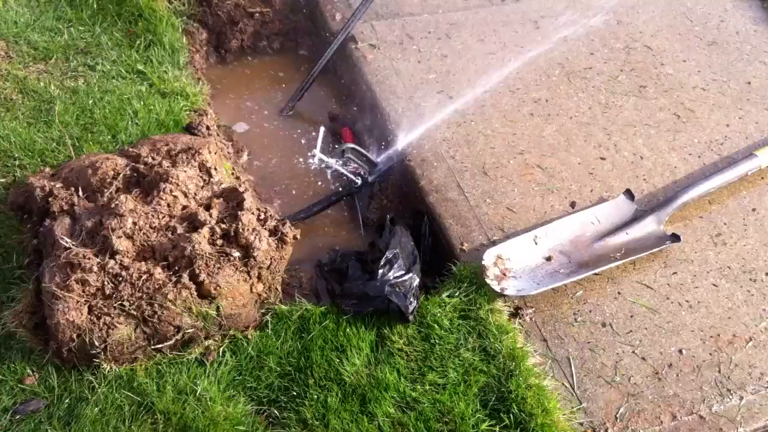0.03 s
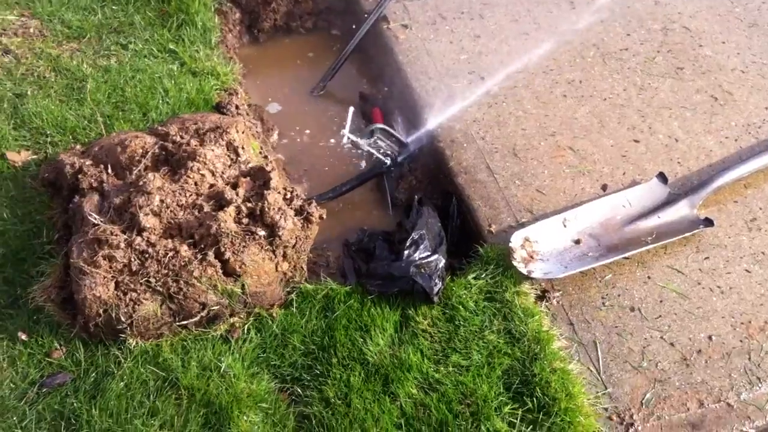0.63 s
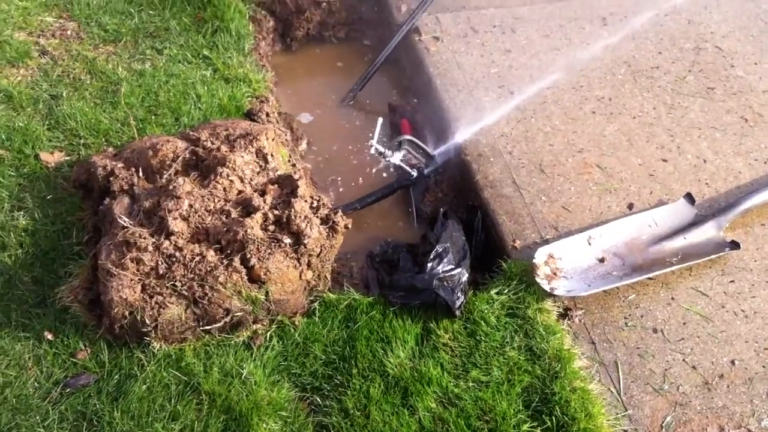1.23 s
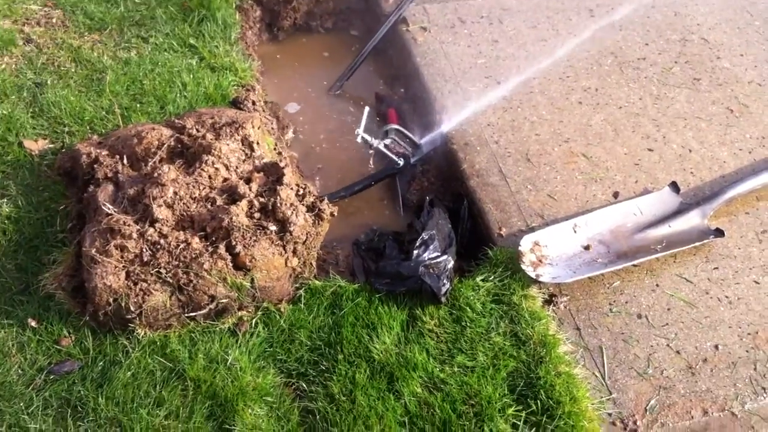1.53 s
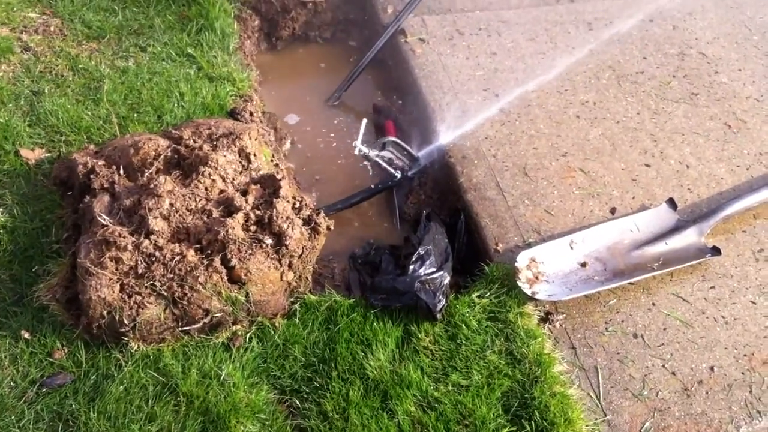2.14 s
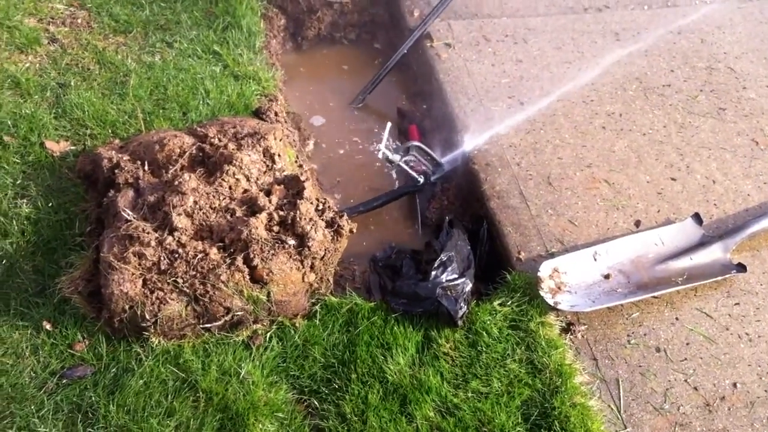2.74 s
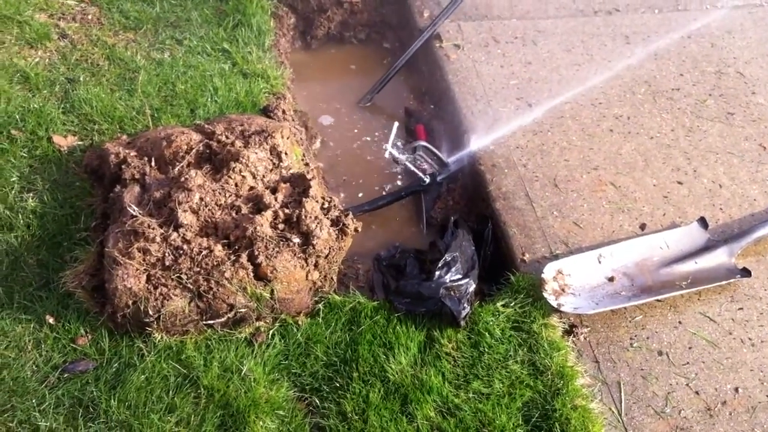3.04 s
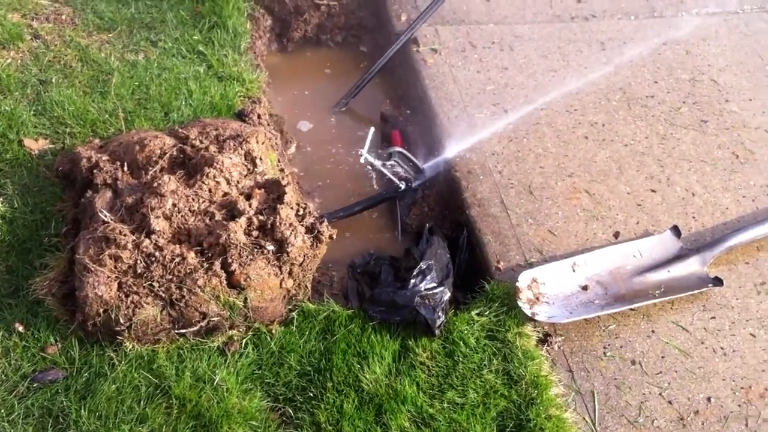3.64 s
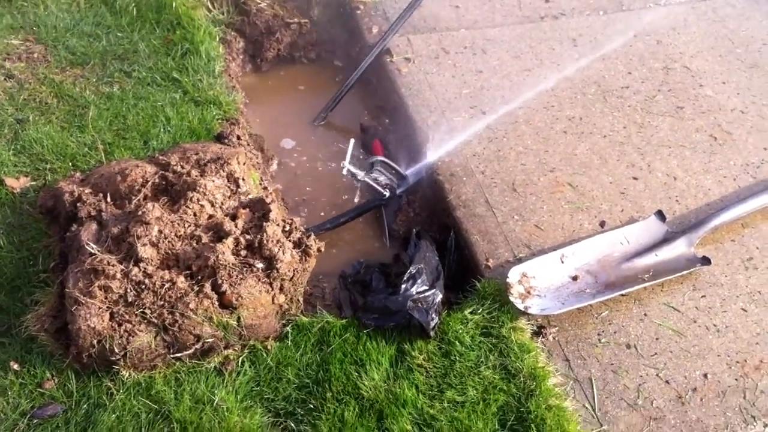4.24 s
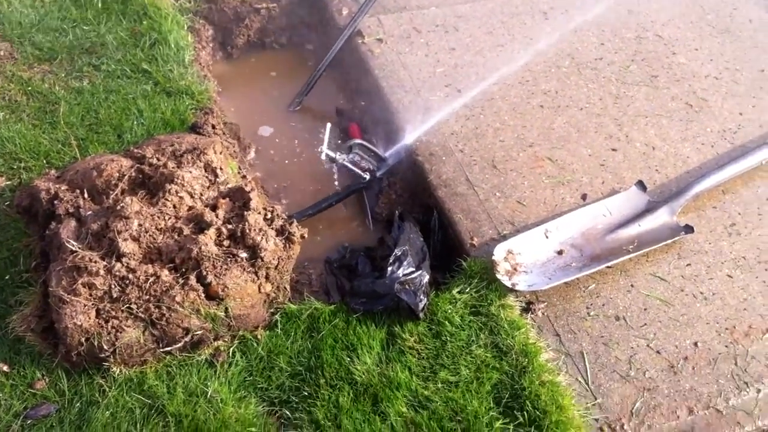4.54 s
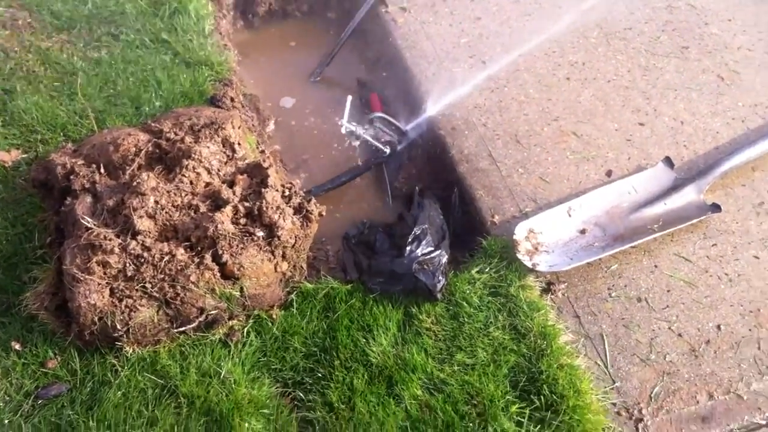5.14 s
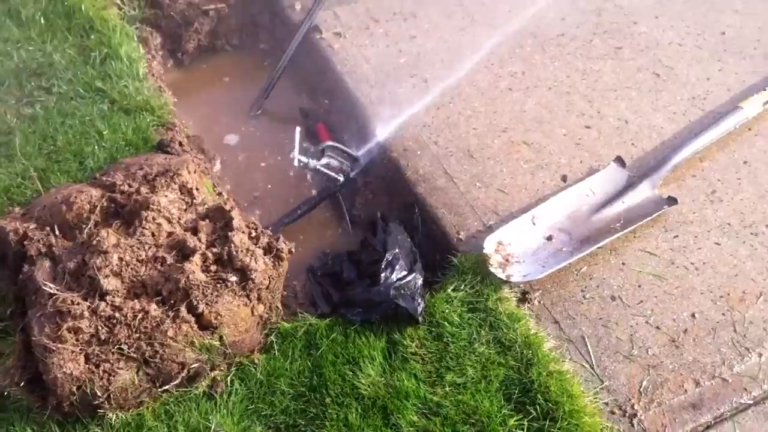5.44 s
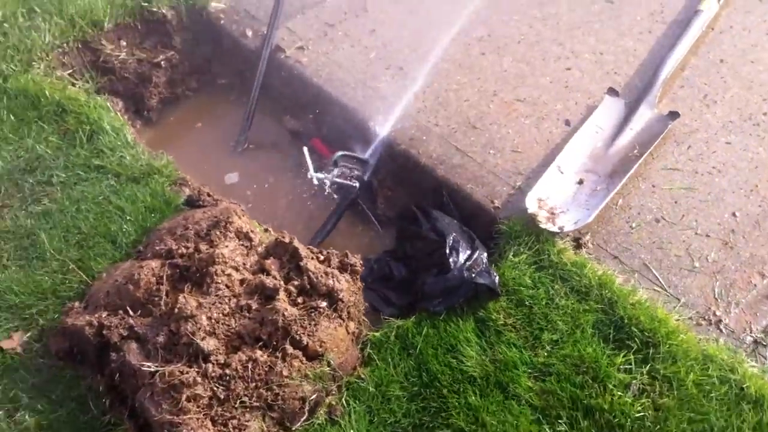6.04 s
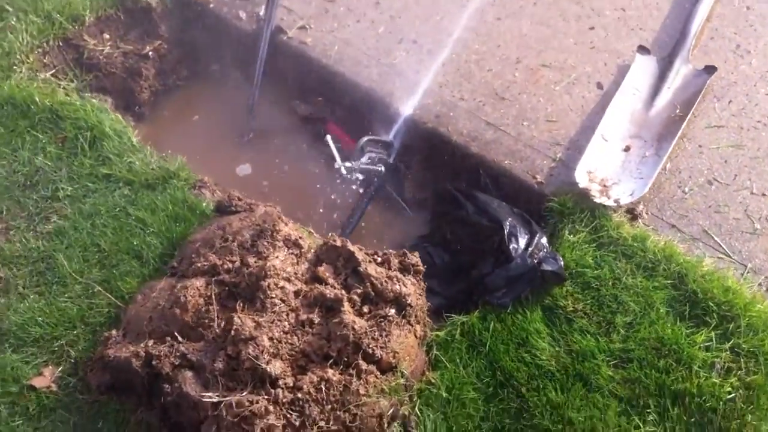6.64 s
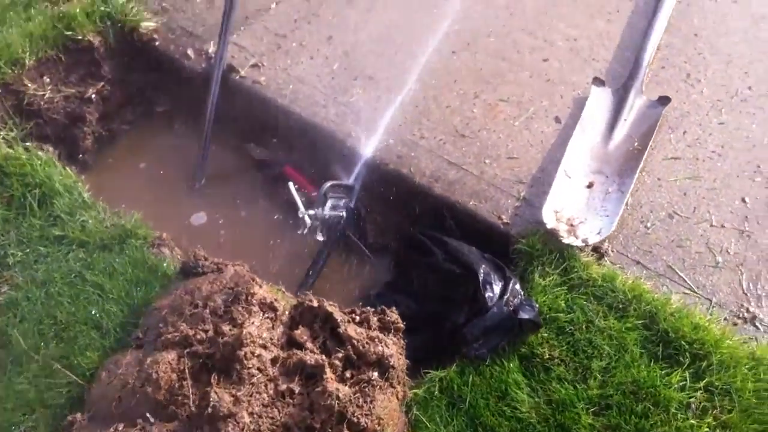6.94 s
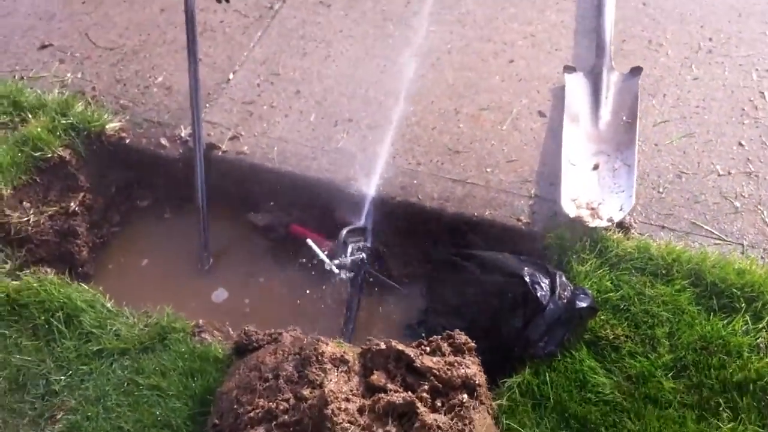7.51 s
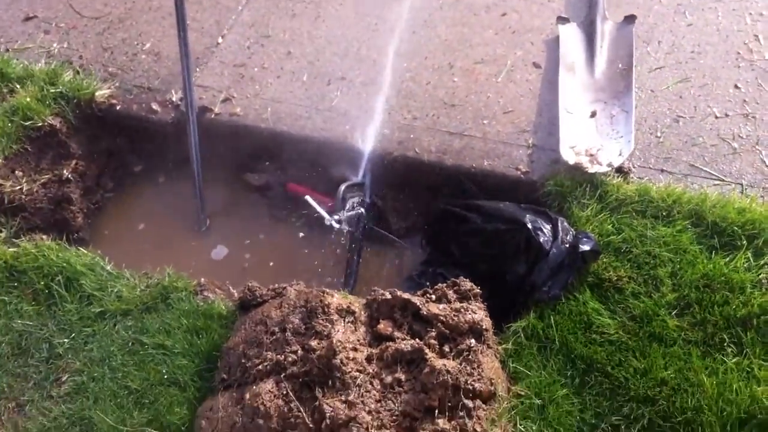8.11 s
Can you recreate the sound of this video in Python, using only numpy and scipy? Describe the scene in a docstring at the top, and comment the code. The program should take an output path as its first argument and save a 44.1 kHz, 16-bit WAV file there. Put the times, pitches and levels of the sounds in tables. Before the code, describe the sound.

A thin jet of water hisses steadily from a split pipe, with faint handling ticks and a few drops plopping into a puddle.

```python
"""Split pipe beside a path

A thin jet of water hisses from a split pipe in a flooded hole, tearing into mist. The hand-held
microphone rumbles, creaks and ticks as its casing slips in the grip. A few drops plop into the puddle,
each ringing a bubble. The microphone is then carried round the hole: the wall reflections that colour
the hiss slide, the treble rises and the hand adds soft bumps."""
import sys
import numpy as np
from scipy import signal
from scipy.fft import rfft, irfft
from scipy.io import wavfile

SR = 44100
rng = np.random.default_rng(int(sys.argv[2]) if len(sys.argv) > 2 else 0)


def inscribe(sig):
    """Save sig as 16-bit PCM at rate SR to the path in sys.argv[1].

    A 1-D sig is mono; a 2-D sig holds one channel per row.
    Samples are clipped to [-1, 1] before scaling.
    """
    pcm = np.round(np.clip(np.atleast_2d(sig).T, -1, 1) * 32767)
    wavfile.write(sys.argv[1], SR, pcm.astype(np.int16))


N = 369116
TIME = np.arange(N) / SR
BIN_HZ = np.arange(N // 2 + 1) * SR / N


def from_db(db):
    """Decibels to gain."""
    return 10 ** (np.asarray(db) / 20)


def unit_rms(x):
    """Scale to an rms of 1."""
    return x / np.sqrt(np.mean(x ** 2) + 1e-20)


def spectrum_db(points, hz):
    """Interpolate (Hz, dB) points on a log-frequency axis."""
    point_hz, db = np.transpose(points)
    return np.interp(np.log(hz + 1), np.log(point_hz), db)


def bell(x, centre, width):
    """Gaussian hump of height 1."""
    return np.exp(-.5 * ((x - centre) / width) ** 2)


def drift(rate_hz):
    """Unit-rms noise, low-passed at rate_hz."""
    return unit_rms(irfft(rfft(rng.standard_normal(N)) / (1 + (BIN_HZ / rate_hz) ** 2), N))


def resonate(x, hz, width_hz):
    """Two-pole resonance, peak gain 1."""
    radius = np.exp(-np.pi * width_hz / SR)
    zeros = np.array([1, 0, -1]) * (1 - radius ** 2) / 2
    poles = [1, -2 * radius * np.cos(2 * np.pi * hz / SR), radius ** 2]
    return signal.lfilter(zeros, poles, x + 1e-18)


def add(out, start_s, sound):
    """Mix a short sound in at start_s."""
    i = max(round(start_s * SR), 0)
    out[i:i + len(sound)] += sound[:N - i]


def mist(spurts_per_s=260, spurt_s=0.0038, spurt_share=0.089, flutter_db=0.61):
    """Water tears into mist: white hiss plus tiny spurts that start sharply and die away."""
    onsets = (rng.random(N) < spurts_per_s / SR) * rng.exponential(1, N)
    spurts = signal.lfilter([1], [1, -np.exp(-1 / (spurt_s * SR))], onsets + 1e-18)
    power = 1 - spurt_share + spurt_share * spurts / spurts.mean()
    return unit_rms(rng.standard_normal(N) * np.sqrt(power) * from_db(flutter_db * drift(rate_hz=19)))


# Peaks and notches from the walls of the hole. Each row: centre in Hz, width in Hz, gain in dB,
# slide over the swing in Hz, gain change over the swing in dB.
WALL_REFLECTIONS = [(1846, 209, 3.1, 49, .6), (2095, 129, -6, 168, 3.3), (2896, 198, 5.2, -221, -2.1),
                    (3314, 64, -6.8, 36, 6.5), (3581, 95, 2.7, 410, .3), (4760, 330, 3.8, -90, -9.5),
                    (5110, 100, -2.8, -150, -2.5), (5470, 227, 3.8, -40, -.3), (6354, 161, -3.4, -51, 0),
                    (7387, 341, 5.7, 245, -2), (7924, 405, -8.9, -58, 5.9), (9763, 321, 5.3, -428, -3.2),
                    (10795, 518, -1, 150, 4.6), (11794, 298, 4, 339, -8.2), (13005, 432, 3.7, 633, -2.9)]


def reflections_db(hz, t, swing_mid_s=6.1, swing_ease_s=0.48, waver_db=0.85):
    """Reflections slide as the microphone swings round the hole; each wavers with the wobbling jet."""
    swing = (1 + np.tanh((t - swing_mid_s) / (2 * swing_ease_s))) / 2   # 0 beside the jet, 1 behind it
    db = 0
    for centre_hz, width_hz, gain_db, slide_hz, change_db in WALL_REFLECTIONS:
        wobble = np.interp(t, TIME, drift(rate_hz=8.8))
        height_db = gain_db + change_db * swing + waver_db * wobble
        db = db + height_db * bell(hz, centre_hz + slide_hz * swing, width_hz)
    return db


# Brightness of the hiss. Each row: time in seconds, relative treble level in dB.
TREBLE_CURVE = [(0.35, -36.5), (0.39, -35.5), (2.14, -34.5), (2.34, -33.5), (3.83, -33.5), (4.25, -32.5),
                (5.37, -33), (5.46, -31), (6.37, -31), (6.61, -28), (6.99, -31), (7.21, -29), (8.3, -28.5)]


def facing_db(hz, t, mean_lift_db=3.5, depth=1.14, reference_hz=14000, exponent=1.08):
    """The treble rises as the microphone comes to face the jet."""
    treble_db = np.interp(t, *np.transpose(TREBLE_CURVE))
    lift_db = mean_lift_db + depth * (treble_db - treble_db.mean())
    return lift_db * (hz / reference_hz) ** exponent


# Base spectrum of the jet. Each row: frequency in Hz, density in dB per Hz.
JET_SPECTRUM = [(30, -104), (65, -112), (110, -94.5), (170, -85.5), (300, -82.5), (550, -86.5), (800, -83),
                (1050, -83.5), (1500, -82), (2600, -81.5), (5000, -71), (8000, -73), (12000, -75.5),
                (14500, -76), (15500, -80)]
# Brief hollows in the hiss. Each row: start and end in seconds, centre and width in Hz, gain in dB.
HISS_DIPS = [(2.99, 3.555, 3230, 990, -3), (2.994, 3.3, 2170, 70, -21)]


def jet(dip_edge_s=0.034):
    """The hiss of the mist, coloured by the hole and by where the microphone is."""
    frames = dict(nperseg=2048, noverlap=1536)
    hz, t, hiss = signal.stft(mist() * np.sqrt(SR / 2), SR, **frames)   # 0 dB per Hz
    hz = hz[:, None]
    db = spectrum_db(JET_SPECTRUM, hz) + facing_db(hz, t) + reflections_db(hz, t)
    for start_s, end_s, centre_hz, width_hz, dip_db in HISS_DIPS:
        inside = np.clip(np.minimum(t - start_s, end_s - t) / dip_edge_s + .5, 0, 1)
        db += dip_db * inside * bell(hz, centre_hz, width_hz)
    _, coloured = signal.istft(hiss * from_db(db), SR, **frames)
    return coloured[:N]


# Handling noise spectrum. Each row: frequency in Hz, relative level in dB.
RUMBLE_SPECTRUM = [(20, 5), (55, -9), (95, 9), (140, 9.5), (260, -7), (400, -27), (900, -45)]


def hand_rumble(rest_db=-78, grip_db=-62, settle_db_per_s=22, carry_db=-55.5, carry_s=6.62, lumps_db=3.5):
    """Lumpy rumble that fades as the grip settles and swells as the microphone is carried."""
    settling = from_db(grip_db - settle_db_per_s * TIME)
    carrying = from_db(carry_db) * bell(TIME, carry_s, width=0.41)
    colour = from_db(spectrum_db(RUMBLE_SPECTRUM, BIN_HZ))
    rumble = unit_rms(irfft(rfft(rng.standard_normal(N)) * colour, N))
    return rumble * (from_db(rest_db) + settling + carrying) * from_db(lumps_db * drift(rate_hz=12))


# Creaks of the grip. Each row: start and length in seconds, relative level in dB, body knock gain in dB.
GRIP_CREAKS = [(0.2094, 0.017, -19, 1), (.233, 0.0024, -23, -2), (0.2922, .0115, -17.5, -2),
               (.3105, 0.0026, -20.5, -8), (0.6502, 0.0114, -19, 3.5), (.7984, 0.002, -24.5, 9),
               (0.8238, 0.0024, -23, 6)]


def creaks(slips_per_s=4000, snap=2.2, gain_db=8):
    """Runs of tiny slips in the grip. Returns the forces on the casing's shell and body."""
    shell, body = np.zeros((2, N))
    for start_s, length_s, db, knock_db in GRIP_CREAKS:
        n = max(round(length_s * SR), 2)
        strengths = 2 * rng.random(SR)[:n] - 1
        slips = strengths * (rng.random(SR)[:n] < slips_per_s / SR)
        slips[0] = snap   # the grip lets go at once, then stutters
        slips = unit_rms(slips) * from_db(db + gain_db)
        add(shell, start_s, slips)
        add(body, start_s, slips * from_db(knock_db))
    return shell, body


# Clear ticks of the casing. Each row: start in seconds, relative peak in dB.
CLEAR_TICKS = [(0.5264, -11), (0.549, -9), (0.9589, -13), (1.076, -6.5), (1.1953, -9), (1.265, -6),
               (1.3166, -8), (1.43, -10.5), (1.744, -7.5), (1.8509, -9.5), (1.897, -11.5), (2.249, -11)]


def ticks(faint_count=7, faint_range_db=(-19, -13), gain_db=9.5, grit_db=-19, grit_s=0.0034):
    """Force of single slips with gritty tails; faint ones fall at random among the clear ones."""
    first_s, last_s = CLEAR_TICKS[0][0], CLEAR_TICKS[-1][0]
    faint = [(rng.uniform(first_s, last_s), rng.uniform(*faint_range_db)) for _ in range(faint_count)]
    force, age = np.zeros(N), TIME[:SR // 100]
    for start_s, db in list(CLEAR_TICKS) + faint:
        slip = from_db(grit_db) * rng.standard_normal(len(age)) * np.exp(-age / grit_s)
        slip[0] = 1
        add(force, start_s, slip * from_db(db + gain_db))
    return force


# Modes of the microphone casing. Each row: frequency in Hz, width in Hz, gain in dB.
CASING_MODES = [(150, 380, -20), (377, 140, -9), (747, 60, -2.5), (1115, 71, -8), (1370, 54, -7.5),
                (1806, 140, -7), (2286, 80, 0), (2616, 200, 2), (3170, 105, 0.5), (3590, 62, 8.5),
                (4200, 82, -11), (4200, 570, -6.5), (5560, 220, 5.5), (6300, 140, 0.5), (6970, 230, 0),
                (9340, 330, -4)]


def casing(body_below_hz=2400, tick_knock_db=-18, crack_db=-12, crack_hz=6000):
    """Slips ring the low body modes and high shell modes; each tick also makes a broad crack."""
    creak_shell, creak_body = creaks()
    tick_force = ticks()
    shell = creak_shell + tick_force
    body = creak_body + tick_force * from_db(tick_knock_db)
    out = from_db(crack_db) * resonate(tick_force, crack_hz, width_hz=crack_hz)
    for k, (hz, width_hz, db) in enumerate(CASING_MODES):
        force = body if hz < body_below_hz else shell
        out += (-1) ** k * from_db(db) * resonate(force, hz, width_hz)
    return out


# Bumps of the hand. Each row: start in seconds, length in seconds, mid-bump level in dB.
HAND_BUMPS = [(1.42, 0.064, -49), (5.817, 0.034, -44.5), (6.215, 0.1, -49), (6.295, 0.034, -49),
              (6.36, .025, -46), (6.807, .025, -47), (6.97, 0.07, -53.5)]


def hand_bumps(hz=175, width_hz=170):
    """The soft hand excites only one broad, low resonance."""
    out, dull = np.zeros(N), rng.standard_normal(N)
    for _ in range(2):
        dull = resonate(dull, hz, width_hz)
    for start_s, length_s, db in HAND_BUMPS:
        n = round(length_s * SR)
        bump = unit_rms(dull[round(start_s * SR):][:n])
        add(out, start_s, from_db(db) * bump * np.sqrt(np.hanning(n)))
    return out


# Drops hitting the puddle. Each row: start in seconds, initial pitch in Hz, peak in dB.
DROPS = [(3.865, 1050, -51), (3.875, 1760, -34), (4.025, 1370, -38), (4.035, 845, -44),
         (4.131, 1090, -37.5), (4.215, 950, -44), (4.31, 1050, -43)]


def plops(decay_db_per_cycle=1, chirp_per_s=2.7):
    """Each drop traps a bubble that rings briefly and rises in pitch."""
    out, age = np.zeros(N), TIME[:SR // 10]
    for start_s, hz, db in DROPS:
        envelope = from_db(db - decay_db_per_cycle * hz * age)
        phase = 2 * np.pi * hz * age * (1 + chirp_per_s * age)
        add(out, start_s, envelope * np.sin(phase))
    return out


def scene():
    """One microphone, the same in both channels."""
    mono = jet() + casing() + plops() + hand_rumble() + hand_bumps()
    return np.array([mono, mono])


def record(dry, open_s=0.17, fade_db_per_s=4000, cutoff_hz=15650):
    """The input opens after a moment of silence; the top is cut steeply."""
    fade_in = from_db(np.clip((TIME - open_s) * fade_db_per_s, -90, 0))
    lowpass = signal.ellip(12, .1, 80, cutoff_hz, fs=SR, output="sos")
    return signal.sosfilt(lowpass, dry * fade_in)


dry = scene()
out = record(dry)
inscribe(out)
```